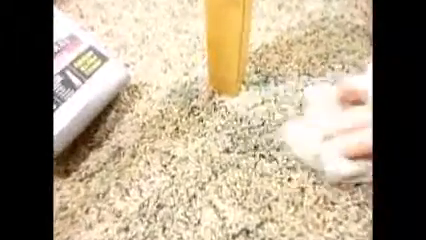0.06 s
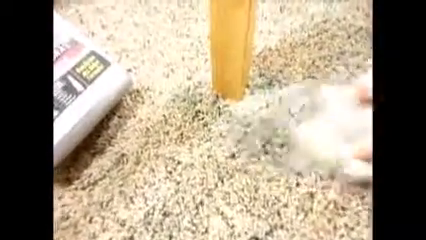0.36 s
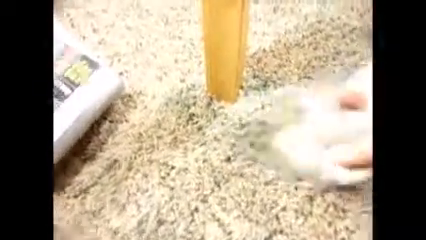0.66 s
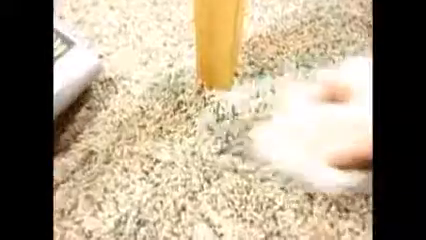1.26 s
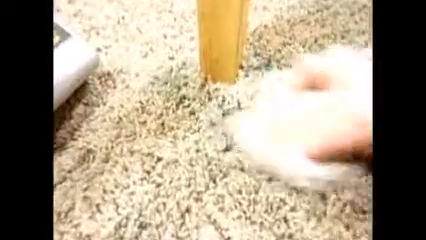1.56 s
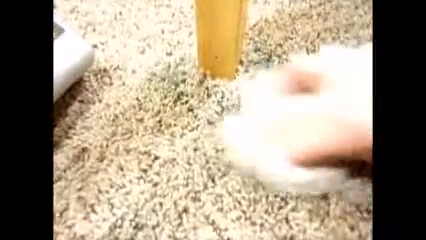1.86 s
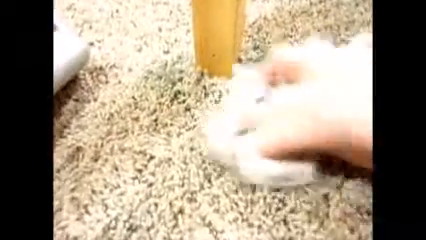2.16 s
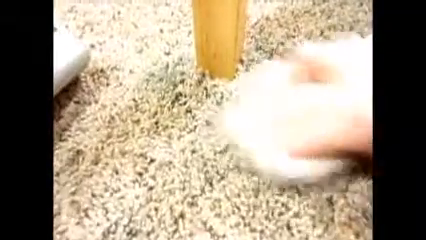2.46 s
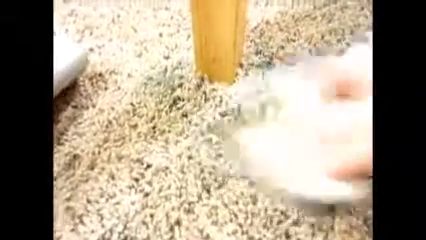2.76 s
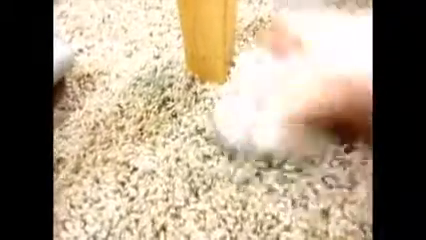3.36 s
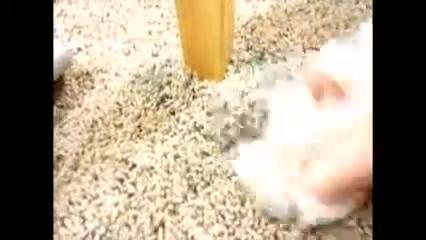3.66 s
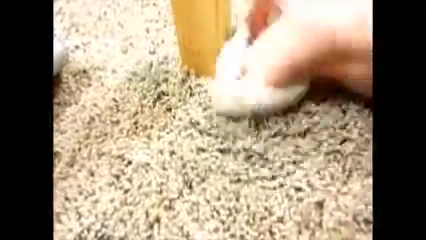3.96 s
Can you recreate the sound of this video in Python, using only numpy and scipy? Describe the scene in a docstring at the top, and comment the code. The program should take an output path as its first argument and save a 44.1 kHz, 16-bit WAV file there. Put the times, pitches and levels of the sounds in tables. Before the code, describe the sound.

A bunched cloth scrubs carpet close to the microphone in a small room, in fast, hissing back-and-forth strokes. Hard pushes make it judder and drum the floor, then the drumming stops and the last strokes quicken.

```python
"""A small carpeted room, two microphones close to a hand that scrubs the carpet with a bunched cloth. The hand
goes back and forth about seven strokes a second; the last strokes are quicker. Fibres flick past the cloth as a
hiss that follows hand speed, over a duller scrape of the pile. On the hard forward pushes the cloth sticks and
slips and drums the floor, until the last second. Three short knocks, the last with a brief high ring, and two
faint squeaks are heard; low room rumble and steady hiss lie behind."""
import sys
import numpy as np
from scipy import signal
from scipy.fft import rfft, irfft
from scipy.io import wavfile
from scipy.ndimage import uniform_filter1d

SR = 44100
rng = np.random.default_rng(int(sys.argv[2]) if len(sys.argv) > 2 else 0)


def unload_audio(sound):
    """Save the sound as a 16-bit wav file, at the path given as the first command line argument."""
    columns = np.transpose(np.atleast_2d(sound))
    # keep every value between -1 and 1, then stretch to whole-number steps
    steps = np.round(np.clip(columns, -1, 1) * 32767)
    wavfile.write(sys.argv[1], SR, steps.astype(np.int16))


N = 176400
TIME = np.arange(N) / SR

# Strokes, each lasting until the next: start t/s, fastest point/stroke, hiss level/dB, scrape level/dB
STROKES = [ (-.04, 0.43, -42.5, -43), (0.11, 0.55, -43, -42.5), (0.27, 0.61, -40.5, -40.5),
           (0.419, 0.52, -43, -41.5), (0.581, 0.63, -42, -43), (.714, 0.58, -42.5, -39),
           (0.865, 0.62, -42, -42.5), (1.002, 0.58, -42, -40), (1.139, 0.57, -42, -39),
           (1.277, 0.51, -43, -41.5), (1.418, 0.54, -42, -41), (1.554, 0.57, -42, -37.5),
           (1.688, 0.56, -41, -40), (1.825, 0.56, -42, -40.5), (1.961, 0.63, -43.5, -42.5),
           (2.094, 0.56, -42, -39.5), (2.221, 0.56, -41, -40.5), (2.346, 0.55, -42, -39),
           (2.476, 0.65, -41.5, -39.5), (2.603, 0.58, -40.5, -37.5), (2.737, 0.63, -41, -38.5),
           (2.875, 0.6, -41.5, -38.5), (2.985, 0.49, -44.5, -43), (3.084, 0.38, -45, -44.5),
           (3.191, 0.56, -43, -43), (3.303, 0.57, -43, -41.5), (3.415, 0.49, -41, -39),
           (3.53, 0.75, -40, -38), (3.629, 0.5, -38.5, -37), (3.73, 0.68, -43, -40.5),
           (3.833, 0.49, -41, -40.5), (3.926, 0.94, -38, -36.5)]
# Fibre hiss close up: f/Hz, relative level/dB
HISS_SPECTRUM = [(300, -20.5), (900, -3), (1300, 1.9), (2000, -2), (3200, 0.5), (4200, 1), (5000, 0),
                 (7600, -3.5), (9000, -18.5)]
# Scrape of the pile: f/Hz, relative level/dB
SCRAPE_SPECTRUM = [(25, -35), (140, -1), (205, 6.5), (260, 2.5), (340, -9.5), (440, 1.5), (520, 0.5),
                   (620, -1.5), (1030, -6), (1400, -14), (2200, -30), (6000, -48)]
def rubbing(hiss_law=1.62, scrape_law=1.75):
    """Fibres hiss and tufts scrape past the cloth, their amplitude a power of the hand's speed."""
    stroke, speed = hand_motion()
    hiss_db, scrape_db = np.transpose(STROKES)[2:]
    flicks = clicks(per_s=14000, spread_db=0.5) * amp(hiss_db[stroke] + wander(0.0092))
    tufts = clicks(per_s=3000, spread_db=0) * amp(scrape_db[stroke] + wander(0.0029))
    hiss = colour(flicks * speed ** hiss_law, HISS_SPECTRUM)
    scrape = colour(tufts * speed ** scrape_law, SCRAPE_SPECTRUM)
    return hiss + scrape


# Rounded turns, where the hand does not quite stop: t/s, speed relative to top speed/dB
TURN_SPEED = [(1.3, -12.5), (1.6, -10), (1.9, -14), (2.75, -13), (3.08, -5.5), (3.45, -12)]
def hand_motion(last_stop_s=4.035, turn_share=0.12):
    """The stroke under way and the hand's speed, which swells and falls once in each."""
    start, fastest = np.transpose(STROKES)[:2]
    position = np.interp(TIME, np.append(start, last_stop_s), np.arange(len(start) + 1))
    stroke = np.minimum(position.astype(int), len(start) - 1)
    progress, peak = position - stroke, np.clip(fastest[stroke], .2, .8)
    rising = abs(np.sin(np.pi / 2 * progress / peak))
    remaining = np.clip((1 - turn_share - progress) / (1 - turn_share - peak), 0, 1)
    braking = np.sin(np.pi / 2 * remaining) ** 0.43  # the hand stops more abruptly than it starts
    speed = np.where(progress < peak, rising, braking)
    least = amp(np.interp(TIME, *np.transpose(TURN_SPEED)))
    return stroke, np.sqrt(speed ** 2 * (1 - least ** 2) + least ** 2)


# Stick-slip bursts on the hard pushes: peak t/s, swell/s, fade/s, level/dB, slip rate f/Hz
SHUDDERS = [ (.19, 0.014, 0.06, -38.5, 168), (0.501, 0.007, 0.049, -27.5, 212),
            (.779, 0.019, 0.024, -35, 180), (.829, 0.036, 0.015, -34.5, 220),
            (1.082, 0.02, 0.031, -30.5, 228), (1.366, 0.031, 0.025, -26, 220),
            (1.398, 0.014, 0.031, -41, 138), (1.6, 0.012, 0.018, -33, 163), (1.652, 0.047, 0.02, -30, 190),
            (1.906, 0.023, 0.019, -26, 213), (2.155, 0.018, 0.018, -28.5, 191),
            (2.187, 0.016, 0.0057, -26, 200), (2.395, 0.014, 0.028, -35, 172),
            (2.425, 0.012, 0.016, -22, 194), (2.682, 0.032, .022, -30, 188),
            (2.711, 0.018, 0.009, -27, 224), (2.958, 0.011, .012, -29.5, 200)]
# Response of the padded floor to the slips: f/Hz, relative level/dB
FLOOR_RESPONSE = [(60, -21.5), (135, 0), (200, -5.5), (270, 4), (345, -16), (435, -8.5), (510, -7.5),
                  (600, -11), (1050, -28.5), (1500, -32.5), (7000, -52)]
def shudder(ring_db=-2.54, rattle_db=-4.5, thud_db=-51.5, thud_hz=(62, 155.5)):
    """Pressed hard, the cloth slips in jerks that drum the floor, over a thud of the hand's weight."""
    at, swell, fade, level_db, rate = np.transpose(SHUDDERS)
    slip_hz = np.interp(TIME, at, rate) * np.exp(.135 * wander(.003))
    cycles = np.cumsum(slip_hz) / SR
    slips = np.diff(np.floor(cycles), prepend=0) * amp(8 * rng.random(N))  # one uneven jerk a cycle
    rough_slips = unit(slips - slips.mean()) + 0.42 * rng.standard_normal(N)
    rattle = unit(colour(rough_slips, FLOOR_RESPONSE))
    waver_db = 1.3 * unit(uniform_filter1d(wander(0.0037), size=200))
    ring = unit(np.sin(2 * np.pi * cycles) * amp(waver_db))  # the floor's main ring, locked to the slips
    power = np.zeros(N)
    for peak_s, up, down, db in zip(at, swell, fade, level_db):
        power += (amp(db) * bump(peak_s, np.where(TIME < peak_s, up, down))) ** 2
    force = np.sqrt(power)
    weight = rng.standard_normal(N) * np.sqrt(force)  # the thud grows more slowly than the drumming
    thud = unit(signal.sosfilt(signal.butter(2, thud_hz, "band", fs=SR, output="sos"), weight))
    return (amp(ring_db) * ring + amp(rattle_db) * rattle) * force + amp(thud_db) * thud


# Short knocks: t/s, knock level/dB, knock f/Hz, tick level/dB, left minus right/dB
KNOCKS = [(1.14, -43, 290, -42, 0), (2.883, -31, 444, -46, -7), (3.733, -33, 285, -44, 0)]
def knocks(knock_decay_s=.0045, tick_decay_s=.002):
    """Short knocks with a tick: two centred, one louder and to the right, perhaps a microphone bump."""
    out = np.zeros((2, N))
    hiss = colour(rng.standard_normal(N), HISS_SPECTRUM)
    for at, knock_db, hz, tick_db, pan_db in KNOCKS:
        age = np.clip(TIME - at, 0, .1)
        knock = amp(knock_db) * np.sin(2 * np.pi * hz * age) * np.exp(-age / knock_decay_s)
        tick = amp(tick_db) * hiss * (age > 0) * np.exp(-age / tick_decay_s)
        sides = amp([[pan_db / 2], [-pan_db / 2]])
        out += sides / sides.mean() * (knock + tick)
    return out


# Faint squeaks, the last row a brief ring after the knock at 3.733 s: t/s, half length/s, f/Hz, level/dB
SQUEAKS = [(1.552, 0.029, 2120, -54), (1.692, 0.019, 1960, -50.5), (3.737, 0.0045, 1980, -49.5)]
def squeaks(pitch_waver=.09):
    """Faint, fuzzy chirps while the cloth moves slowly, and a brief high ring after the last knock."""
    clock = np.cumsum(1 + pitch_waver * wander(0.00046)) / SR
    return sum(amp(db) * bump(at, half) * np.sin(2 * np.pi * hz * clock) for at, half, hz, db in SQUEAKS)


def near_scatter(x, decay_s=0.0023, size=1024, count=7):
    """Quick reflections off the hand and furniture ripple the treble, differently from stroke to stroke."""
    paths = rng.standard_normal((count, size)) * np.exp(-np.arange(size) / SR / decay_s)
    paths = signal.sosfilt(signal.butter(2, 700, "high", fs=SR, output="sos"), paths)
    which = hand_motion()[0] % count
    return sum(convolve(x * (which == j), taps) for j, taps in enumerate(paths))


# Decay of the room: f/Hz, t60/s
ROOM_DECAY = [(230, 0.16), (600, 0.11), (7000, 0.031)]
def room_echo(x, onset_s=0.0057):
    """The short tail of a carpeted room, each band dying at its own speed."""
    hz, t, bands = signal.stft(rng.standard_normal(16384), SR, nperseg=256)
    decay = amp(-60 * t / value_at(ROOM_DECAY, hz)[:, None])
    tail = signal.istft(bands * decay * np.minimum(t / onset_s, 1), SR, nperseg=256)[1]
    return convolve(x, tail)


# Rumble of the room: f/Hz, relative level/dB
RUMBLE_SPECTRUM = [(20, -9.5), (90, 0), (240, -7.5), (350, -17), (1000, -14), (2000, -38.5)]
def room_rumble(level_db=-54.5):
    """Low, steady room tone, shared by both microphones."""
    return amp(level_db) * colour(rng.standard_normal(N), RUMBLE_SPECTRUM)


# Background hiss: f/Hz, relative level/dB
AIR_SPECTRUM = [(40, -12), (150, -2.5), (440, 0), (700, -4), (1000, 1.5), (1600, -2), (2500, -5.5),
                (7600, -12), (9000, -40)]
def air_hiss(level_db=-61.5):
    """Steady hiss, unrelated in the two microphones."""
    return amp(level_db) * np.array([colour(noise, AIR_SPECTRUM) for noise in rng.standard_normal((2, N))])


# Stereo width at the microphones: f/Hz, side level/dB
WIDTH = [(600, -44), (1400, -25), (2800, -15), (5600, -11)]
# Balance of the pair: f/Hz, left minus right/dB
BALANCE = [(900, 0), (2400, -1.1), (4000, -.7), (6500, 1.6)]
def microphone_pair(mid, side):
    """Two close microphones: alike in the bass, parting in the treble."""
    hz = np.fft.rfftfreq(N, 1 / SR)
    sign = np.array([[1], [-1]])
    spectra = rfft(mid) + sign * rfft(side) * amp(value_at(WIDTH, hz))
    return irfft(spectra * amp(sign * value_at(BALANCE, hz) / 2), N)


def clicks(per_s, spread_db):
    """Random tiny impacts, uneven in size by spread_db."""
    size = amp(spread_db * np.minimum(rng.exponential(1, N), 4))
    return unit(size * rng.choice([-1., 1.], N) * (rng.random(N) < per_s / SR))


def wander(seconds):
    """Random drift that changes over the given time."""
    return unit(signal.lfilter([1], [1, -np.exp(-1 / (seconds * SR))], rng.standard_normal(N)))


def bump(at, width_s):
    """A bell-shaped swell and fade."""
    return np.exp(-np.minimum(((TIME - at) / width_s) ** 2, 20))


def colour(x, spectrum, size=4096):
    """Causal filter of unit energy with the given spectrum."""
    log_gain = np.log(amp(value_at(spectrum, abs(np.fft.fftfreq(size, 1 / SR)))))
    minimum_phase = np.exp(np.conj(signal.hilbert(log_gain)))
    return convolve(x, np.fft.ifft(minimum_phase).real[:size // 2])


def convolve(x, taps):
    """Pass x through a response scaled to unit energy."""
    return signal.oaconvolve(x, taps / np.linalg.norm(taps))[:N]


def value_at(points, hz):
    """A curve's value at hz, on a log-frequency axis."""
    f, value = np.transpose(points)
    return np.interp(np.log(hz + 1), np.log(f + 1), value)


def amp(db):
    return 10 ** (np.asarray(db) / 20)


def unit(x):
    return x / np.sqrt(np.mean(x ** 2) + 1e-20)


def scene():
    """Cloth and floor close to the microphones, the room faint behind them."""
    rub, drum = rubbing() + squeaks(), shudder()
    cloth = rub + amp(-9.5) * near_scatter(rub) + amp(-17.5) * room_echo(rub)
    floor = drum + amp(-16) * room_echo(drum)
    mid = cloth + floor + room_rumble()
    return air_hiss() + microphone_pair(mid, side=rubbing()) + knocks()


def record(dry, low_cut_hz=42, notch_hz=5430, notch_width_hz=380, top_hz=7730):
    """The recorder cuts the deepest bass, has one narrow notch in the treble and a low band limit."""
    bass_cut = signal.sosfilt(signal.butter(3, low_cut_hz, "high", fs=SR, output="sos"), dry)
    notched = signal.lfilter(*signal.iirnotch(notch_hz, notch_hz / notch_width_hz, SR), bass_cut)
    low_pass = signal.firwin(241, top_hz, window=("kaiser", 8), fs=SR)
    return signal.oaconvolve(notched, low_pass[None], "same")


dry = scene()
out = record(dry)
unload_audio(out)
```